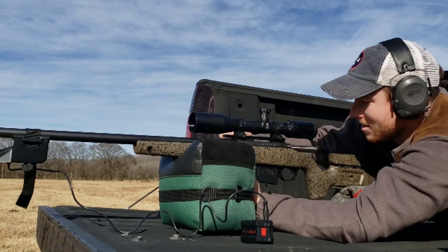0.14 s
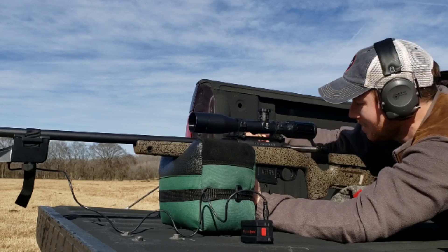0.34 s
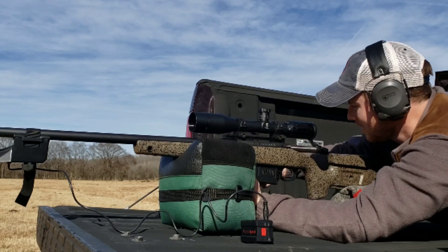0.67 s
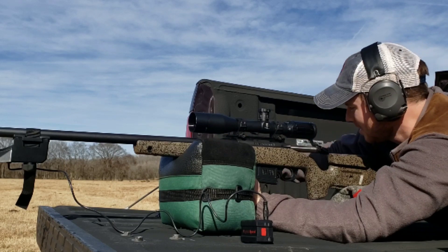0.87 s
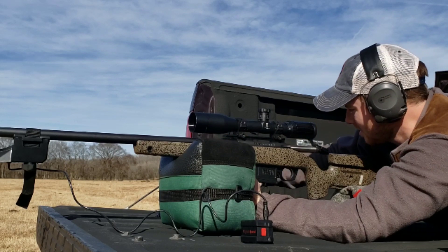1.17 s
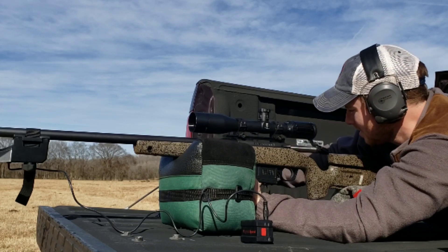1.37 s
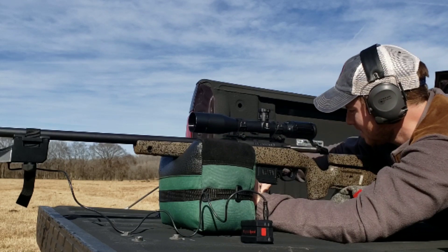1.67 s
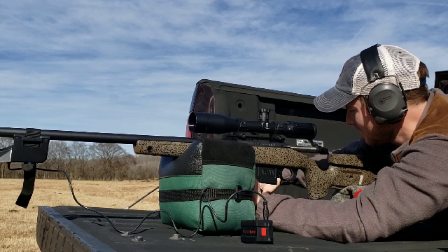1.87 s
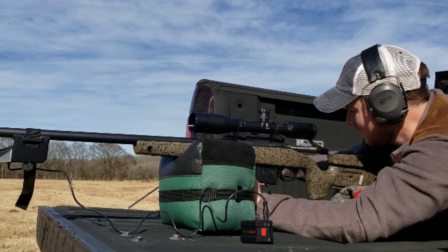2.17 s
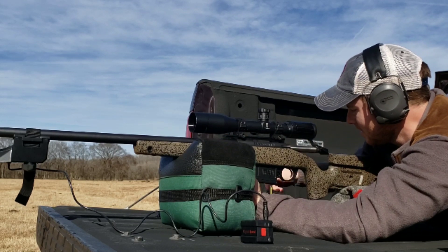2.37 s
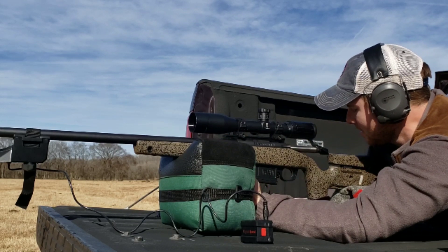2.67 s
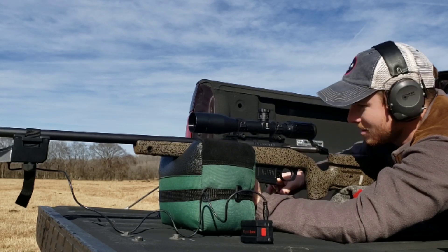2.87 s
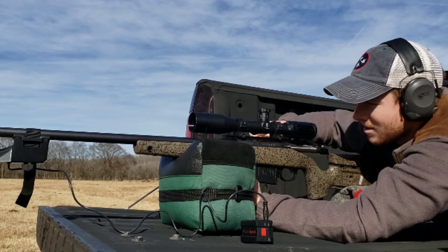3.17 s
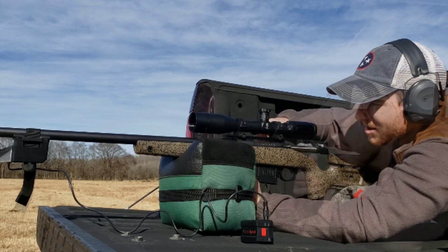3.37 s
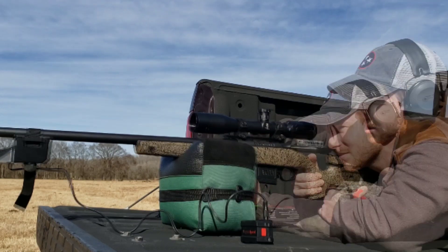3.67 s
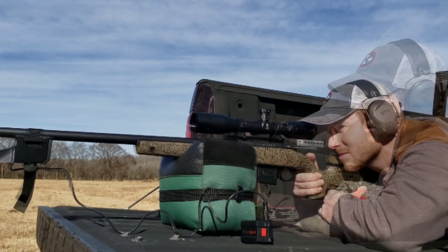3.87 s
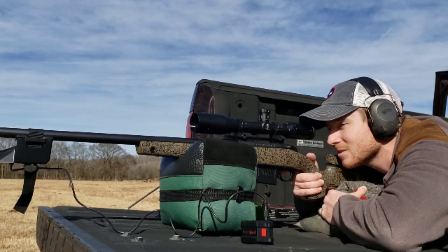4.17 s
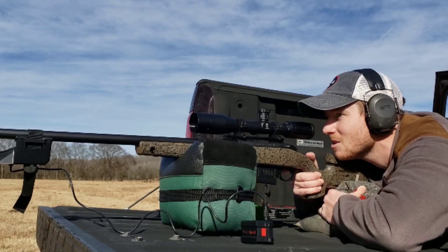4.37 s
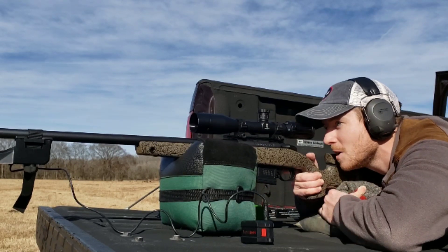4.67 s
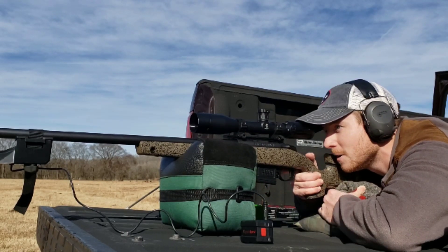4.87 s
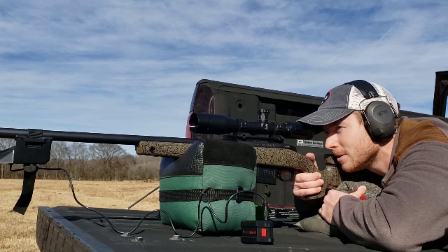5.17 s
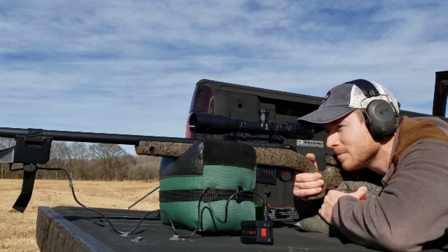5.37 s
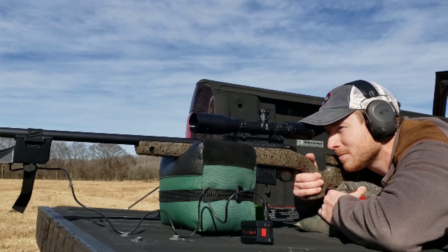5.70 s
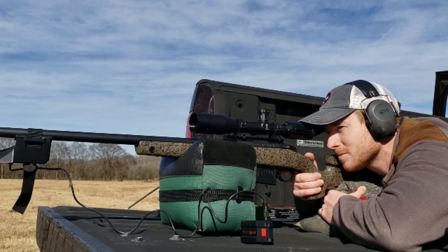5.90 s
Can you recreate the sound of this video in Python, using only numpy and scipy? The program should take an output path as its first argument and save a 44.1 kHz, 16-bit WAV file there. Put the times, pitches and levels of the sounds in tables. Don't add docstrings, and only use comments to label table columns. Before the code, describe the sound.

Close stereo outdoor pickup with low wind buffeting and thin hiss. A quick metal slide opens, then a ringing double clack of a rifle bolt, a light scrape, and the loudest hard clunk on a hollow bed, with small bounces. The wind drops almost to quiet before faint latch ticks; an abrupt change brings a new gust, a deep hollow thud, cloth rubbing and muted knocks.

```python
import sys
import numpy as np
from scipy import signal
from scipy.fft import rfft, irfft
from scipy.io import wavfile

SR = 44100
rng = np.random.default_rng(int(sys.argv[2]) if len(sys.argv) > 2 else 0)


def materialize(psi):
    bounded = np.clip(np.atleast_2d(psi).T, -1, 1)
    quanta = np.round(bounded * 32767).astype(np.int16)
    wavfile.write(sys.argv[1], SR, quanta)


def ratio(d):
    e = np.asarray(d, float) / 20
    return 10 ** e


N = 266408
TIME = np.arange(N) / SR

SLOW = 8
WIND_TIME = TIME[::SLOW]
CUT_S = 3.7436
LATER = WIND_TIME >= CUT_S

EDGES = 18 * 2 ** np.arange(0, 10.1, .5)
BANK = [signal.butter(3, pair, "band", fs=SR, output="sos") for pair in zip(EDGES, EDGES[1:])]

# hz, left_right_likeness
STEEL_ALIKE = [(60, 0.5), (250, 0.6), (600, 0.75), (1000, 0.29), (1500, -.4), (2600, 0.75), (4500, -0.12),
               (8000, 0)]
# hz, left_right_likeness
BED_ALIKE = [(60, 0.9), (240, 0.96), (950, 0.75), (3800, .3)]
# pitch_hz, level_db, t60_s
BED_MODES = [(71, -15, 0.57), (115, -1, 0.13), (211, 1.5, 0.098), (255, 4, 0.14), (291, -13.5, 0.44),
             (531, -23, 0.18), (654, -23, 0.24), (695, -23, 0.11), (871, -11.5, 0.077), (1066, -28, 0.15),
             (1230, -23.5, 0.051), (1990, -38, 0.095), (2520, -52, 0.05)]
# time_s, level_db, brightness_db_per_octave
STROKES = [
    [(0, -58, 4), (.017, -78.5, -11), (.0185, -56.5, -7.5), (.0445, -51, -4.5), (.0457, -45, -0.5),
     (.07, -46, -0.5), (.078, -50.5, 2), (.093, -61.5, 3.5), (.13, -72.5, 2.5), (.16, -85, -3)],
    [(2.05, -79, -4), (2.07, -70.5, -33), (2.12, -69.5, -8), (2.15, -70.5, -2), (2.185, -76, -3),
     (2.2, -70.5, 7.5), (2.22, -76.5, 10), (2.27, -97, 10.5)],
    [(4.26, -95.5, 3), (4.3, -83, 1.5), (4.368, -70.5, 2.5), (4.448, -70.5, 0.5), (4.47, -61.5, -6.5),
     (4.5, -77, -2), (4.56, -85, -6)],
    [(5.3, -99, 0.0042), (5.43, -74, 0), (5.56, -87, 0)],
]


def rms_one(x):
    return x / np.sqrt(np.mean(x ** 2) + 1e-20)


def in_time(spans):
    s, *columns = np.transpose(np.concatenate(spans))
    return [np.interp(TIME, s, column) for column in columns]


def at_hz(points, hz):
    table_hz, value = np.array(points).T[:2]
    return np.interp(np.log(hz), np.log(table_hz), value)


def bands(spectrum, likeness, size, order=1):
    white = rng.standard_normal((2, 2, size))
    for k, (low, high) in enumerate(zip(EDGES / order, EDGES[1:] / order)):
        if spectrum[0][0] < low < spectrum[-1][0]:
            hz = np.sqrt(low * high)
            mid, side = signal.sosfilt(BANK[k], white[k % 2])
            alike = np.clip(at_hz(likeness, hz), -.95, .97)
            pair = np.sqrt(1 + alike) * mid + np.sqrt(1 - alike) * side * [[1], [-1]]
            yield hz, ratio(at_hz(spectrum, hz)) * pair


def to_ports(pair, s):
    lag_s = 0.00005 if s < 2.5 else 0.00026
    lag = round(lag_s * SR)
    return np.array([np.r_[np.zeros(lag), pair[0, :-lag]], pair[1]])


def ring(clicks, hz, t60):
    r, w = ratio(-60 / (t60 * SR)), 2 * np.pi * hz / SR
    return signal.lfilter([0, np.sin(w)], [1, -2 * r * np.cos(w), r * r], clicks + 1e-18)


def slide(stroke, surface, slips_per_s, uneven_db):
    out = np.zeros((2, N))
    first, last = round(stroke[0][0] * SR), round(stroke[-1][0] * SR)
    level_db, bright = (curve[first:last] for curve in in_time([stroke]))
    for hz, db, t60 in surface:
        size_draw, sign_draw, slip_draw = rng.random((3, 2, last - first))
        size = ratio(-uneven_db * np.log(size_draw + 0.014))
        slips = size * np.sign(sign_draw - .5) * (slip_draw < slips_per_s / SR)
        shared, apart = rms_one(ring(slips, hz, t60))
        pair = shared + 0.31 * apart * np.c_[[1, -1]]
        out[:, first:last] += pair * ratio(level_db - 4.5 + db + bright * np.log2(hz / 1000))
    return to_ports(out, stroke[0][0])


def blows(hits, modes, body, decay, alike, ring_db, body_db, contact_s, crack_db, crack_s, size):
    out, t = np.zeros((2, N)), TIME[:size]
    crack = ratio(crack_db * np.exp(-t / crack_s))
    rise = (1 - np.exp(-t / contact_s)) ** 2 * crack
    for s, peak_db, bright in hits:
        tones = 0
        for (hz, db, t60), luck in zip(modes, rng.standard_normal((len(modes), 5))):
            beat = 1 + .6 * np.sin(2 * np.pi * 14 * luck[4] * t)
            phase = .4 * luck[2] + .25 * hz / 1000 * luck[3] * np.c_[[1, -1]]
            level = ratio(db + bright * np.log2(hz / 1000) + 2.6 * luck[:2, None]) * ratio(-60 * t / t60)
            tones = tones + level * beat * np.sin(2 * np.pi * hz * t + phase)
        dense = 0
        for hz, band in bands(body, alike, size):
            tilt_db = bright * np.log2(min(hz, 4520) / 1000)
            dense = dense + band * ratio(tilt_db - 60 * t / at_hz(decay, hz))
        i = round(s * SR)
        struck = rise * (ratio(ring_db) * tones + ratio(body_db) * dense)
        out[:, i:i + size] += ratio(peak_db) * to_ports(struck, s)
    return out


def drift(rate_hz):
    r = np.exp(-2 * np.pi * rate_hz * SLOW / SR)
    noise = rng.standard_normal(len(WIND_TIME) + 4000)
    return rms_one(signal.lfilter([1], [1, -2 * r, r * r], noise)[4000:])


def swells(rows):
    total = 0
    for s, db, fall_s, pan_db in rows:
        level_db = db - 10 * np.abs(WIND_TIME - s) / max(fall_s, .01)
        same_scene = LATER == (s >= CUT_S)
        total = total + ratio(level_db + pan_db * np.c_[[.5, -.5]]) * same_scene
    return total


def narrowed(pair, side_db):
    mid, side = (pair[0] + pair[1]) / 2, (pair[0] - pair[1]) / 2
    return mid + side * ratio(side_db * LATER) * np.c_[[1, -1]]


def wind():
    # hz, level_db_per_hz
    rumble_colour = [(12, -39.5), (22, -16), (33, -10), (48, 2.5), (70, 1), (120, -5.5), (170, -14.5),
                     (222, -19), (258, -22), (400, -37), (520, -65.5), (880, -120)]
    # hz, level_db_per_hz
    flutter_colour = [(170, -30), (240, -4), (300, 1), (450, -7.5), (620, -23.5), (900, -36), (1300, -53),
                      (1700, -71)]
    # hz, left_right_likeness
    wind_alike = [(60, -0.0011), (240, -0.081), (950, -0.28), (3770, -0.05), (15000, 0.0)]
    # time_s, level_db
    breeze = [(0, -43), (.2, -53.5), (.6, -69), (.75, -63.5), (1.1, -47), (1.3, -63), (1.5, -54.5),
              (1.95, -50.5), (2.06, -64.5), (2.6, -71.5), (2.95, -78), (3.25, -58.5), (3.6, -57),
              (3.73, -56.5), (3.76, -51.5), (4.3, -59), (5.1, -52.5), (5.5, -55), (5.63, -55.5),
              (6.04, -55.5)]
    # peak_s, peak_db, fall_10db_s, left_right_db
    gust_rows = [(.12, -40, -0.1, 2), (.24, -32, 0, 1), (.1, -35, -0.03, -1.5), (.14, -45, -0.13, 0),
                 (.32, -41, 0.02, -4), (.365, -36.5, -0.0642, 3), (.665, -62, -1.25, -1),
                 (1.05, -55, -0.27, 2), (3.05, -72, -0.04, -2), (.5, -57, 0.26, -20), (.635, -51, -0.3, 2),
                 (.84, -48, 0.01, -13), (.96, -31.5, -0.0658, 3.5), (1.2, -67.5, -2.2, 4),
                 (1.37, -56, 0.17, -21.5), (1.56, -47, 0.076, -7), (1.725, -37.5, -0.09, -4),
                 (1.85, -28.5, 0.0111, -6.5), (1.935, -40, 0.0238, -9), (2.14, -77, -1.5, 9),
                 (2.235, -69, 0.11, -10), (2.315, -47, -0.15, -2), (2.51, -66.5, 0.2, -11.5),
                 (2.68, -57.5, -0.16, -3), (3.08, -69.5, -0.04, 1), (3.2, -63.5, -0.07, -5),
                 (3.31, -41.5, -0.01, -1.5), (3.555, -40, 0.0252, -2), (3.655, -56, -0.1, 0.5),
                 (3.755, -37.5, -0.0247, -1), (3.925, -68.5, 0.8, -2), (4.012, -40.5, 0, 1),
                 (4.17, -47.5, 0.05, 6), (4.48, -55, 0.1, 0), (4.82, -43, 0.0154, 1), (5.22, -43.5, 0, 0),
                 (5.285, -58, 0.03, 5), (5.36, -58, 0.05, 2), (5.57, -55.5, 0.03, 1.5),
                 (6.02, -54.5, 0.02, 4)]
    # peak_s, peak_db, fall_10db_s, left_right_db
    whip_rows = [(.3, -68.5, 1.06, 16), (1.37, -52.5, -0.3046, -3.5), (1.65, -60.5, 0.04, 5),
                 (1.94, -56, 0.0374, 4.5), (3.615, -57.5, -0.07, -3), (3.645, -49, 0.0152, -2.5),
                 (3.69, -52, -0.03, 4.5), (1.0, -68, -0.13, 5), (.38, -61, -0.3, 3), (1.87, -64, 0.04, 6),
                 (4.78, -68, 0.1, -2), (4.92, -66, -0.1, -5), (4.01, -79, 0.3, 0), (4.13, -61, 0.28, 2.5),
                 (4.5, -65, 0.08, 2.5), (4.8, -61, 0.07, 2), (5.4, -62, 0.25, 3.5)]

    force = ratio(in_time([breeze])[0][::SLOW]) + swells(gust_rows)
    lumps = drift(23)
    rumble = flutter = 0
    for hz, band in bands(rumble_colour, wind_alike, len(lumps), order=SLOW):
        tilt_db = LATER * 3 * np.log2(hz / 70)
        rumble = rumble + band * ratio(1.3 * lumps + 2.4 * drift(8.1) + tilt_db)
    for hz, band in bands(flutter_colour, wind_alike, len(lumps), order=SLOW):
        tilt_db = LATER * 16.5 * max(np.log2(hz / 500), -.4)
        flutter = flutter + band * ratio(0.66 * lumps + 2.5 * drift(19.0) + tilt_db)

    riding = ratio(-72) * (force / ratio(-46.5)) ** .55 + swells(whip_rows)
    gusts = force * narrowed(rms_one(rumble), side_db=-15)
    gusts = gusts + riding * narrowed(rms_one(flutter), side_db=-3.5)

    push_db, push_hz, push_t60_s = -40, 88, .22
    after, later = np.maximum(TIME - CUT_S, 0), TIME >= CUT_S
    push = later * ratio(push_db - 60 * after / push_t60_s) * np.cos(2 * np.pi * push_hz * after - 1.1)
    fresh = np.where(later, np.minimum(after / .015, 1), 1)
    return signal.resample_poly(gusts, SLOW, 1, axis=1)[:, :N] * fresh + push


def hiss():
    # time_s, level_db
    hiss_level = [
        [(0, -85.5), (2.7, -86), (3.2, -90), (3.5, -99), (3.743, -102)],
        [(3.744, -83), (6.04, -85.5)],
    ]
    # hz, level_db_per_hz
    hiss_colour = [(350, -34), (600, -5), (716, -1), (952, -4), (1120, -7), (1220, -6.5), (2090, -8.5),
                   (2750, -11), (8360, -22), (12400, -14), (15400, -14.5)]
    hz = np.linspace(1, SR / 2, N // 2 + 1)
    noise = irfft(rfft(rng.standard_normal((2, N))) * ratio(at_hz(hiss_colour, hz)), N)
    return ratio(in_time(hiss_level)[0] + 8.5) * rms_one(noise)


def bolt_slide():
    # pitch_hz, level_db, t60_s
    raceway = [(723, -7, 0.0088), (1040, 0, 0.014), (1217, 4, 0.02), (1734, -5, 0.024),
               (2474, -13.5, 0.026), (3820, -19.5, 0.016), (6820, -27, 0.0078), (7600, -43.5, 0.0046),
               (10940, -21.5, 0.0036)]
    return slide(STROKES[0], raceway, slips_per_s=2500, uneven_db=-1.5)


def pings():
    # start_s, peak_db, pitch_hz, t60_s
    catches = [(.0855, -52, 7200, 0.005), (.0455, -48, 1200, .02), (.0455, -60, 3850, .015),
               (0.052, -50, 1230, .02), (.0575, -62, 3800, .012), (.063, -56, 2600, .02),
               (.068, -50, 1200, 0.022), (0.074, -55, 1150, .03), (.073, -63, 5600, .008),
               (1.6, -59, 2950, .04), (1.436, -56, 980, .06), (1.4885, -35.5, 2980, 0.037),
               (1.482, -36, 1600, 0.067), (1.5725, -47, 2600, 0.023), (2.214, -58, 4400, .008),
               (2.214, -59, 4900, 0.0087), (2.8, -60, 1000, .03), (2.212, -62, 1180, .02),
               (4.393, -55.5, 7900, 0.0094), (1.4805, -33.5, 3200, 0.012), (1.488, -44, 2950, 0.023),
               (1.5427, -33, 3200, 0.014), (1.546, -30.5, 900, 0.018), (1.552, -39.5, 2950, .03),
               (2.658, -31.5, 2070, .04), (2.684, -32, 1150, 0.069), (4.1, -45.5, 1100, .07),
               (4.098, -61, 2400, .06), (5.13, -67, 2500, .06), (3.598, -72, 4000, 0.043),
               (1.572, -45, 1800, 0.012), (2.6588, -24, 840, 0.057), (2.6572, -26, 1170, 0.035),
               (2.675, -23.5, 790, 0.068), (2.742, -37.5, 810, 0.061), (3.657, -40, 370, 0.032),
               (3.63, -78.5, 6400, .12), (4.0945, -36, 950, .03), (4.771, -55, 810, .04),
               (5.1194, -39.5, 260, .06), (5.194, -45, 245, 0.06), (5.196, -54.5, 970, .06),
               (5.7, -67, 770, 0.032)]
    out = np.zeros((2, N))
    after = TIME[:9000]
    for s, db, hz, t60 in catches:
        i = round(s * SR)
        rise = 1 - np.exp(-after * hz)
        tone = ratio(db - 60 * after / t60) * np.sin(2 * np.pi * hz * after) * rise
        out[:, i:i + len(after)] += to_ports(np.array([tone, tone]), s)
    return out


def loose_chatter():
    # start_s, peak_db, brightness_db_per_octave
    contacts = [(1.3945, -58.5, -0.5), (1.405, -60, -2), (1.436, -63.5, -3), (1.465, -64, -3),
                (1.481, -56, 1), (1.4915, -60, 1.5), (1.5105, -61, 2), (1.525, -64, 1.5), (1.543, -57, 1),
                (1.558, -63, 0), (1.573, -59, -3), (1.595, -68, -4.5), (2.655, -50, -5), (2.667, -51, -5.5),
                (2.69, -60, -4), (2.699, -62, -1.5), (2.71, -62, -4), (2.745, -60, -7.5), (2.81, -66, -9),
                (4.0945, -66, -1), (4.12, -61, -8), (4.15, -64.5, -8)]
    # pitch_hz, level_db, t60_s
    modes = [(980, 0, .06), (2506, -4, .03), (2950, 0, .04), (5097, -12, .02)]
    # hz, level_db_per_hz
    body = [(800, -12), (1100, -3), (1900, -7.5), (2900, -1.5), (4200, -9.5), (6000, -11), (7600, -14),
            (9200, -32), (12000, -22), (14000, -24)]
    # hz, t60_s
    decay = [(1000, .16), (3000, 0.073), (7000, 0.18), (12000, .12)]
    return blows(contacts, modes, body, decay, STEEL_ALIKE, ring_db=-16.0, body_db=3.0,
                 contact_s=.0002, crack_db=5, crack_s=.003, size=5000)


def bolt_knocks():
    # start_s, peak_db, brightness_db_per_octave
    hits = [
        (1.395, -50, 8.5),
        (1.405, -55.5, 9.5),
        (1.434, -53.5, 3),
        (1.479, -20, 1),
        (1.488, -26, 1.5),
        (1.511, -38, 5.5),
        (1.5422, -22, 1.4),
        (1.552, -40.5, 0),
        (1.574, -40, -0.5),
    ]
    # pitch_hz, level_db, t60_s
    modes = [(475, -3.5, 0.24), (506, -14, 0.12), (487, -5.5, 0.11), (640, -8, 0.29), (710, -20, 0.11),
             (964, 2, 0.097), (1056, -2.5, .1), (1602, 0, 0.14), (1990, -13, 0.18), (2437, -40, .1),
             (2860, -2.5, 0.034), (2930, -7.5, 0.064), (3810, -13, 0.043)]
    # hz, level_db_per_hz
    body = [(120, -46.5), (200, -19), (345, -5.5), (385, -11), (471, 3), (827, -5), (1090, -2.5),
            (1260, -11.5), (1590, -13.5), (2900, -17.5), (4920, -44), (8000, -58), (15500, -63.5)]
    # hz, t60_s
    decay = [(200, 0.39), (1000, 0.17), (3000, 0.1), (7000, 0.095), (12000, 0.093)]
    return blows(hits, modes, body, decay, STEEL_ALIKE, ring_db=-20.0, body_db=1.0,
                 contact_s=0.00036, crack_db=9, crack_s=.004, size=9000)


def cartridge_slide():
    # pitch_hz, level_db, t60_s
    magazine = [(814, -7, 0.024), (970, -5.5, 0.017), (1185, 0, 0.0093), (1706, -12, 0.017),
                (3500, -23, 0.011), (4110, -19, 0.015), (5200, -21, 0.0055), (6540, -32, 0.0092)]
    return slide(STROKES[1], magazine, slips_per_s=190, uneven_db=3.0)


def dropped_part():
    # start_s, peak_db, brightness_db_per_octave
    hits = [
        (2.653, -24.5, 1.5),
        (2.6562, -13, 0.82),
        (2.701, -33.5, 2.9),
        (2.745, -45.5, 0.5),
        (2.81, -51.5, 0.58),
    ]
    # pitch_hz, level_db, t60_s
    modes = [(251.8, 3.5, 0.15), (341, -5, 0.27), (502, -8.5, 0.2), (515, 3.5, 0.17), (568, -10.5, 0.51),
             (667, -4.5, 0.17), (730, -4, .22), (732, -6.5, 0.21), (811, 3.5, 0.17), (803, -5.5, 0.2),
             (1040, -3.5, 0.055), (1090, 2, 0.099), (1346, -13.5, 0.1), (1380, -21.5, .12),
             (1686, -7.5, 0.16), (1810, -22, 0.12), (2567, -27.5, .1), (3500, -32, 0.051)]
    # hz, level_db_per_hz
    body = [(100, -51), (170, -17), (260, -5.5), (390, -8.5), (520, -4.5), (800, -8.5), (1100, -9),
            (1500, -18), (2200, -28.5), (3500, -39.5), (5500, -61.5), (12000, -79), (16000, -105)]
    # hz, t60_s
    decay = [(200, 0.52), (600, 0.45), (1000, 0.24), (1500, 0.14), (2200, 0.19), (3500, 0.12), (8000, .07)]
    # hz, left_right_likeness
    alike = [(100, 0.9), (290, 0.88), (640, 0.8), (1000, .5), (2500, 0.4), (6000, 0)]
    drop = blows(hits, modes, body, decay, alike, ring_db=-17.5, body_db=4.5,
                 contact_s=0.00078, crack_db=9, crack_s=.007, size=20000)
    return signal.sosfilt(signal.butter(2, 210, "high", fs=SR, output="sos"), drop)


def latch_ticks():
    # start_s, peak_db, brightness_db_per_octave
    hits = [
        (3.5853, -61, 0.61),
        (3.5976, -61, 0.72),
        (3.605, -82.5, 0.6),
        (3.617, -70.5, 0.57),
        (3.645, -75.5, 0.6),
        (4.0014, -63.5, 0.44),
    ]
    # pitch_hz, level_db, t60_s
    modes = [(1570, 2, .05), (3280, 0.5, 0.058), (4000, -4, 0.044), (5260, 4, 0.043), (7500, -4, 0.072),
             (8180, -6.5, .03), (9970, -5.5, 0.026)]
    # hz, level_db_per_hz
    body = [(590, -45.5), (1000, 2.5), (2050, -0.5), (5340, 0.5), (6270, -25), (7370, -7), (15800, -20)]
    # hz, t60_s
    decay = [(2000, 0.12), (12000, 0.12)]
    return blows(hits, modes, body, decay, STEEL_ALIKE, ring_db=-15.5, body_db=-10.0,
                 contact_s=.0001, crack_db=7, crack_s=.003, size=4000)


def bed_thuds():
    # start_s, peak_db, brightness_db_per_octave
    hits = [
        (3.996, -34, -3),
        (4.0935, -11, 1.16),
        (4.134, -28, -3),
    ]
    # hz, level_db_per_hz
    body = [(40, -39), (70, -10), (140, -4.5), (280, -6), (460, -24.5), (820, -14), (1200, -36.5),
            (1500, -43.5), (2400, -43.5), (3200, -70.5), (9000, -66), (14000, -110)]
    # hz, t60_s
    decay = [(70, 0.8), (250, 0.68), (900, 0.26), (2000, 0.35), (4000, 0.067)]
    return blows(hits, BED_MODES, body, decay, BED_ALIKE, ring_db=-9, body_db=2.5,
                 contact_s=0.0017, crack_db=4, crack_s=.02, size=14000)


def sleeve_drag():
    # pitch_hz, level_db, t60_s
    sleeve = [(835, 1.5, 0.03), (1710, 0, 0.0093), (2470, 1, 0.00337), (3280, -4.5, 0.0013),
              (4660, -5.5, 0.0015), (5800, -1, 0.0039), (7000, -7.5, 0.0041)]
    return slide(STROKES[2], sleeve, slips_per_s=9300, uneven_db=0.5)


def cloth_knocks():
    # start_s, peak_db, brightness_db_per_octave
    hits = [
        (4.77, -45, 4.2),
        (5.1195, -42.5, 0.88),
        (5.193, -34.5, 3.2),
    ]
    # hz, level_db_per_hz
    body = [(88, -34), (150, 12), (275, -12.5), (398, -12.5), (689, -15.5), (824, -20), (1200, -29),
            (1680, -42.5), (2500, -47.5), (4000, -57.5), (5200, -77.5), (8800, -120)]
    # hz, t60_s
    decay = [(250, 0.18), (1000, 0.26), (3000, 0.27)]
    return blows(hits, BED_MODES[1:5], body, decay, BED_ALIKE, ring_db=-8.0, body_db=7.5,
                 contact_s=0.00072, crack_db=3, crack_s=.01, size=8000)


def cloth_scuff():
    # pitch_hz, level_db, t60_s
    scuff = [(1990, 0, 0.0042), (2510, 0, .005), (3290, -10, 0.003)]
    return slide(STROKES[3], scuff, slips_per_s=8600, uneven_db=1.0)


def scene():
    air = wind() + hiss()
    rifle = bolt_slide() + pings() + loose_chatter() + bolt_knocks() + cartridge_slide() + latch_ticks()
    bed = cloth_knocks() - dropped_part() - bed_thuds()
    cloth = sleeve_drag() + cloth_scuff()
    return air + rifle + bed + cloth


def band_limit(x):
    return signal.sosfilt(signal.butter(12, 15500, fs=SR, output="sos"), x)


def record(dry):
    heard = signal.sosfilt(signal.butter(2, 41, "high", fs=SR, output="sos"), dry)
    return band_limit(heard)


dry = scene()
out = record(dry)
materialize(out)
```